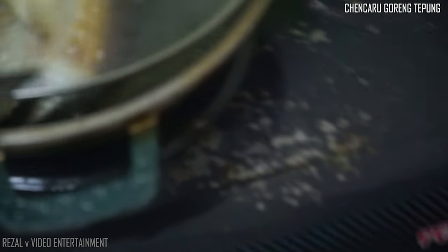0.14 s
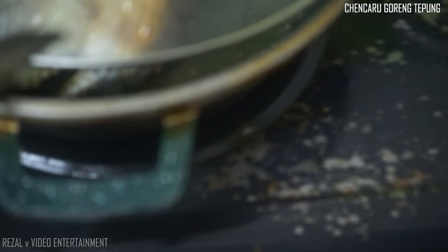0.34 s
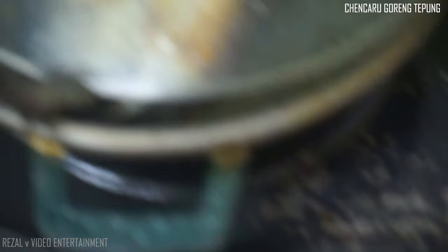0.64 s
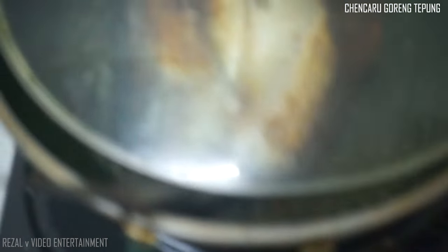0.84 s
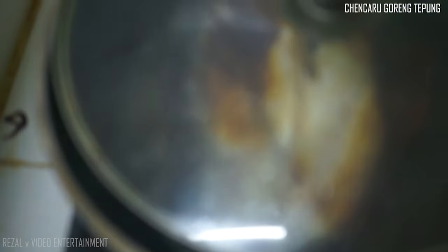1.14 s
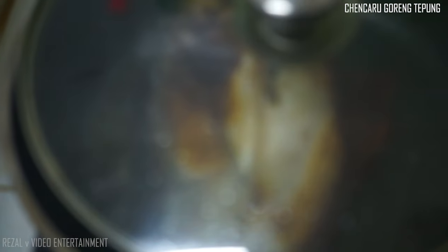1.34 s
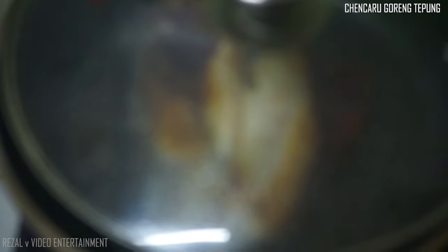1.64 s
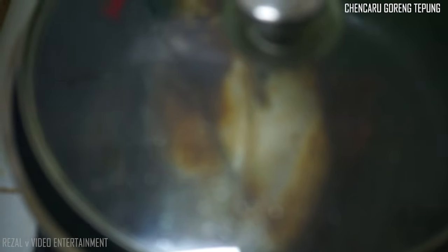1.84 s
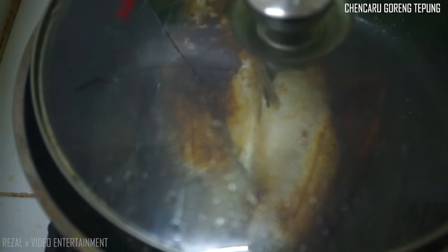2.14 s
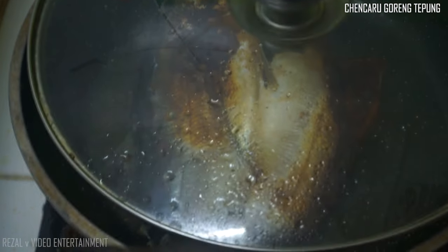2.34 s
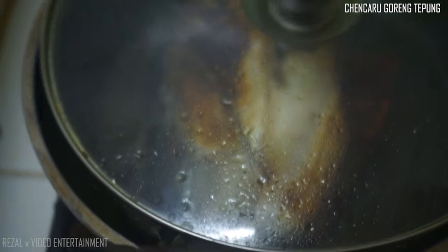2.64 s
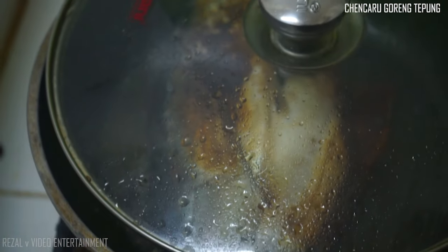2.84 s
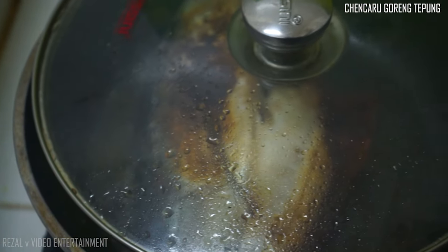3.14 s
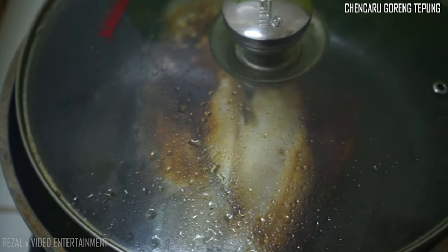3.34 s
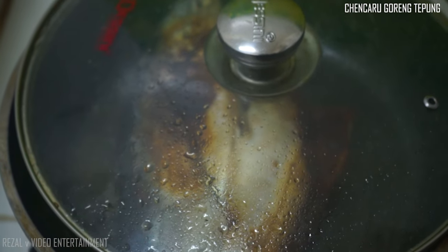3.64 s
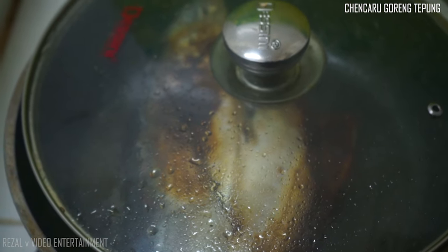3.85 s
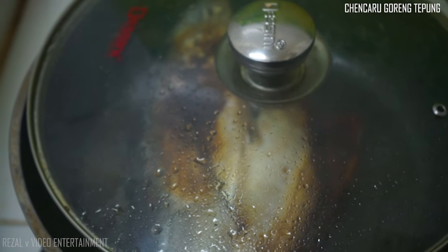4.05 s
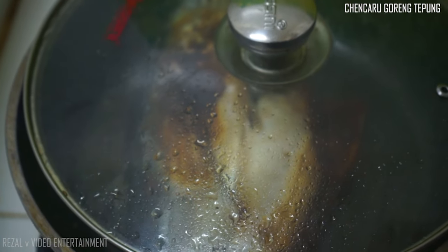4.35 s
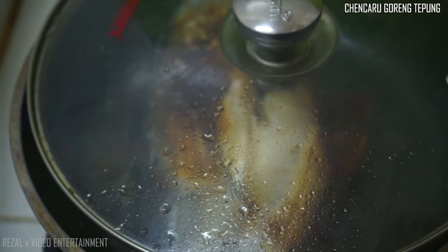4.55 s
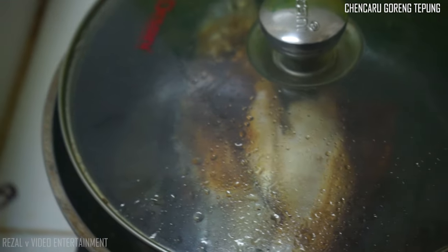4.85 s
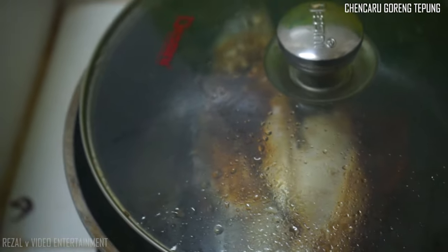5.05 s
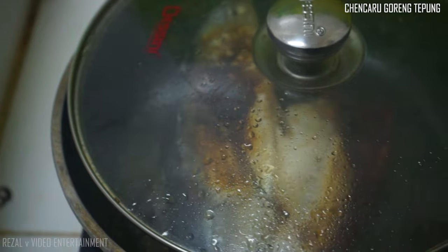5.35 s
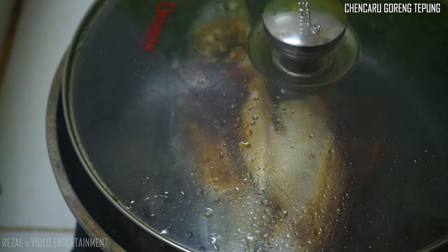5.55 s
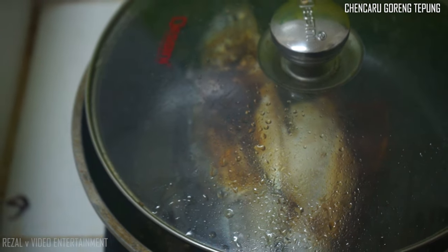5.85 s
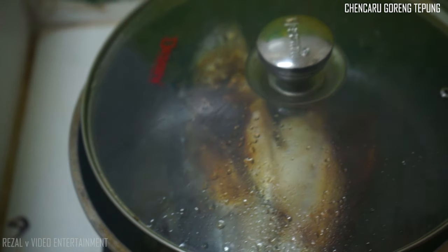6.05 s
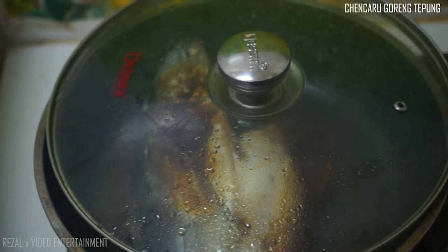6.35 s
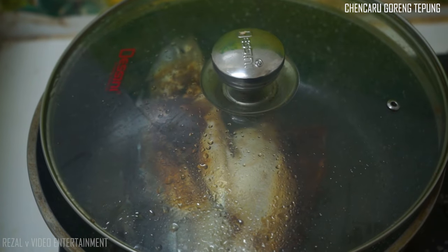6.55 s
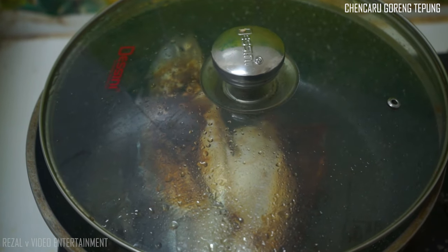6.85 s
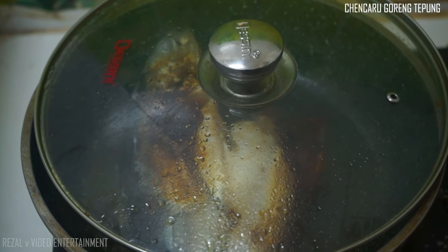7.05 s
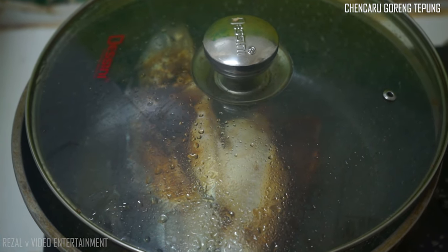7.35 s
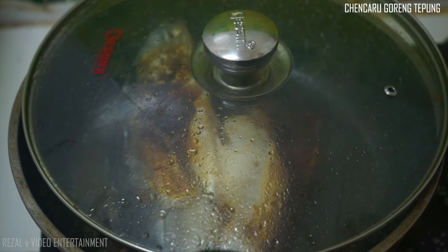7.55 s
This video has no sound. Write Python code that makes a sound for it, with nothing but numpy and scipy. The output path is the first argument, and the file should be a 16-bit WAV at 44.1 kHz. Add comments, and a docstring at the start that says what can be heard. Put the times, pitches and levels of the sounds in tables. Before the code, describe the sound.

Fish frying in hot oil under a glass lid, a dense, steady sizzle with small pops and plops.

```python
"""A dense sizzle: floured fish fries in hot oil under a glass lid, heard from close by in a small kitchen.
Countless steam bubbles burst, each an impulse that excites the resonances of the covered pan:
big ones ring the air under the lid, small ones spatter in spurts, the finest fizz out past the rim.
A few plops, jets of steam and sharp snaps stand out, over a low rumble and a faint mains hum."""
import sys
import numpy as np
from scipy import signal
from scipy.fft import rfft, irfft, next_fast_len
from scipy.io import wavfile
from scipy.ndimage import uniform_filter1d, map_coordinates

SR = 44100
rng = np.random.default_rng(int(sys.argv[2]) if len(sys.argv) > 2 else 0)


def dump(signal):
    """Clip the signal to [-1, 1] and save it as 16-bit WAV at the path in sys.argv[1]."""
    limited = np.clip(np.atleast_2d(signal).T, -1, 1)
    pcm = np.round(limited * 32767).astype(np.int16)
    wavfile.write(sys.argv[1], SR, pcm)


N = 339565
TIME = np.arange(N) / SR
SIZE = next_fast_len(N + SR, real=True)
HZ = np.fft.rfftfreq(SIZE, 1 / SR)
# excitation spectrum of a small bubble: (frequency [Hz], relative level [dB])
SMALL_PUSH = [(200, -15), (1600, -6), (2300, -0.5), (4400, -0.5), (6000, -1.5), (10000, -18), (16000, -18)]


def sizzle():
    """Shot noise: the boil drives four sizes of bubble, stirred together by flurries and surges of steam."""
    # how hard the oil boils: (time [s], relative level [dB])
    boil_curve = [(0, -1), (.7, 0.15), (1.15, -1), (1.65, -1.3), (2, -1.5), (2.7, -0.85), (3.2, -0.4),
                  (3.85, 0), (4.15, 1), (4.78, 1.3), (5.05, 0.5), (5.6, 0.65), (5.98, -0.8), (6.25, 1.5),
                  (6.55, -1), (7.35, -2), (7.7, -1.5)]
    # excitation spectra of big, fine and the finest bubbles: (frequency [Hz], relative level [dB])
    big_push = [(50, -4.5), (400, 3), (1750, 3), (2300, -11), (4000, -32.5), (9000, -14.5)]
    fizz_push = [(200, -21), (2500, -7.5), (4200, -4.5), (5500, 2.5), (9500, 0), (11500, -5.5),
                 (16000, -12.5)]
    spray_push = [(200, -40), (5000, -16), (8500, -11), (11000, -2.5), (16000, 4)]
    boil, = curves(boil_curve)
    steam, surge = flurries(rate=90, life=0.011), wobble(16)
    drying_db = 0.13 * (TIME - TIME.mean())  # the spatter thins as the crust dries
    big_db = -37.5 + 0.84 * boil + 1.08 * steam + 0.5 * wobble(14)
    small_db = -26 + boil - drying_db + 1.55 * steam + 0.65 * surge
    fizz_db = -22.5 + 0.85 * boil + 0.09 * steam + 0.3 * surge + 0.65 * wobble(22)
    spray_db = -27 + 1.05 * boil + 1.1 * flurries(rate=55, life=0.014) + 0.47 * surge
    spray_gain = np.hypot(amp(spray_db), jets())
    big = amp(big_db) * blurred(bursts(rate=550, scatter_db=2.5, spread=0.063), haze_db=-24, life=0.015)
    small = amp(small_db) * blurred(bursts(3000, scatter_db=4.5, spread=0.38), haze_db=-5.5, life=0.0042)
    fizz = amp(fizz_db) * blurred(bursts(6000, scatter_db=4.5, spread=0.29), haze_db=0.5, life=0.0032)
    spray = spray_gain * blurred(bursts(5000, scatter_db=5, spread=0.78), haze_db=2, life=0.0037)
    crackle = through_pan(small, SMALL_PUSH) + through_pan(fizz, fizz_push)
    return through_pan(big, big_push) + shifting(crackle, patchy_db=1.67) + through_pan(spray, spray_push)


def bursts(rate, scatter_db, spread):
    """A Poisson process: rate clicks a second, of random size and place in the pan; stereo, rms 1."""
    at = np.flatnonzero(rng.random(N) < rate / SR)
    size, side = rng.standard_normal((2, N))[:, at]
    polarity = np.where(at % 2, 1, -1)
    strength = amp(scatter_db * np.clip(size, -2, 2)) * polarity
    place = np.pi / 4 + spread * np.tanh(side)
    clicks = np.zeros((2, N))
    clicks[:, at] = strength * np.array([np.cos(place), np.sin(place)])
    return unit(clicks)


def flurries(rate, life):
    """Relaxation: activity jumps at random moments and dies away; mean 0, rms 1."""
    starts = rng.exponential(size=N).clip(0, np.pi) * (rng.random(N) < rate / SR)
    activity = decaying(starts, life)
    return unit(activity - activity.mean())


def blurred(clicks, haze_db, life):
    """Diffuse reflection: the echoes of countless bubbles merge into a trailing hiss, unlike at each ear."""
    energy = decaying(np.mean(clicks ** 2, axis=0), life)
    haze = unit(np.sqrt(energy) * rng.standard_normal((2, N)))
    return unit(clicks + amp(haze_db) * haze)


def through_pan(x, push, low_hz=170, size=4096):
    """Source and filter: impulses with the spectrum push ring the covered pan, at unit power gain."""
    # modes of the pan and the air under its lid: (frequency [Hz], bandwidth [Hz], relative level [dB])
    pan_modes = [(240, 114, -20), (484, 175, -9.5), (628, 265, -15), (1094.5, 163, 0), (1650.5, 148, -1.5),
                 (1958, 185, -6.5), (2213, 340, -4.5), (2547, 216, -0.5), (2865, 363, 1.5),
                 (3560, 370, -0.1), (3996, 180, -2), (4296, 250, -0.5), (4710, 115, -0.5),
                 (5600, 640, -4.5), (6130, 730, -4)]
    # sound leaking straight past the rim: (frequency [Hz], relative level [dB])
    leak = [(40, -66), (200, -32), (800, -21), (1500, -19), (3200, -9.5), (4600, -4.5), (6300, -2.5),
            (7600, -1), (8600, -2.5), (9800, -3), (10800, -6.5), (12500, -9.5), (14200, -14.5),
            (16000, -19)]
    f = np.fft.rfftfreq(size, 1 / SR)
    mode_power = sum((amp(db) / (1 + (2 * (f - hz) / width) ** 2)) ** 2 for hz, width, db in pan_modes)
    pan_gain = np.sqrt(mode_power + amp(along(leak, f)) ** 2)
    radiated = f ** 3 / np.hypot(f ** 3, low_hz ** 3)  # the pan is too small to give off bass
    response = causal(unit(pan_gain * radiated * amp(along(push, f))))
    return signal.oaconvolve(x, response[None], axes=1)[:, :N]


def shifting(x, patchy_db, patch_size=(3, 14)):
    """Modal coupling depends on position: as the bubbling moves about, resonances come and go."""
    spectra = signal.stft(x, nperseg=512)[2]
    patches = rng.standard_normal(spectra.shape[1:])
    for axis, width in enumerate(patch_size):  # bins, then frames
        patches = uniform_filter1d(patches, width, axis)
    return signal.istft(spectra * amp(patchy_db * unit(patches)), nperseg=512)[1][:, :N]


def spurts(gain_db=-3, ring_db=2, width_hz=550, crack_db=15.5):
    """Flash boiling of juice: a crack, then a fading swarm of bubbles ringing at the pitch of its spot."""
    # juice meeting the oil: (time [s], relative level [dB], decay time [s], ring frequency [Hz])
    drops = [(.133, -16, 0.013, 2820), (.288, -20, 0.0077, 5530), (.352, -19, .012, 4220),
             (.371, -18.5, 0.015, 4740), (.442, -16, .008, 3500), (.64, -23, .04, 5900),
             (.915, -15, 0.0093, 6060), (1.485, -18, .014, 4300), (1.554, -23, .006, 5500),
             (2.416, -21.5, 0.016, 4370), (2.622, -19, 0.033, 3730), (2.83, -16.5, 0.012, 4250),
             (2.856, -21.5, 0.018, 3590), (2.893, -16, .015, 2820), (2.957, -16, 0.0041, 3560),
             (3.07, -21, .015, 5900), (3.235, -17.5, .011, 5420), (3.281, -17.5, .008, 5490),
             (3.521, -16.5, 0.0088, 2580), (3.8, -18.5, 0.0083, 5510), (3.988, -21, 0.011, 2920),
             (4.209, -15, .008, 6140), (4.509, -16.5, 0.0088, 4330), (4.687, -20.5, 0.042, 3600),
             (5.367, -18, .02, 6150), (5.54, -17, .015, 4650), (5.671, -20, .01, 6080),
             (6.13, -18, 0.015, 5470), (6.562, -20, 0.022, 2890), (6.635, -25, 0.011, 4080),
             (6.751, -20, 0.022, 4330), (7.513, -16.5, 0.013, 5680)]
    swarm = blurred(bursts(rate=7000, scatter_db=3.5, spread=0.35), haze_db=-9, life=0.006)
    puffs, cracks = np.zeros((2, N)), np.zeros((1, N))
    for s, db, life, hz in drops:
        start = round(s * SR)
        t = TIME[:N - start][:SR // 4]
        span = slice(start, start + len(t))
        puff = amp(db + gain_db) * np.exp(-t / life) * swarm[:, span]
        ring = signal.lfilter(*signal.iirpeak(hz, hz / width_hz, SR), puff)
        puffs[:, span] += puff + amp(ring_db) * ring
        cracks[0, start] = amp(db + crack_db)
    # excitation spectrum of a crack: (frequency [Hz], relative level [dB])
    crack_push = [(200, -7), (1200, -1), (4000, -0.5), (7000, -7), (16000, -20)]
    return through_pan(puffs, SMALL_PUSH) + through_pan(cracks, crack_push)


def plops(gain_db=10.5, boom_db=-26, boom_life=0.042, churn_db=-31, churn_life=0.008):
    """Impulse excitation: a big bubble pushes the air under the lid, churns the oil and booms the pan."""
    # big bubbles bursting: (time [s], relative level [dB], boom offset [dB])
    bubbles = [(.442, -16, -12), (.982, -15.5, -8), (1.178, -16, -12), (1.555, -15.5, -17),
               (2.627, -16.5, -9), (3.201, -11.5, .5), (3.519, -15, -4), (4.223, -11.5, -10),
               (4.305, -8, -4.5), (4.42, -18, -10), (4.638, -15, -2), (4.687, -17, -4), (4.908, -15, -13),
               (5.224, -11.5, -12), (5.249, -3.2, -10), (5.284, -16, -12), (5.507, -17.5, -9),
               (6.776, -18.5, -3), (6.905, -17, -8), (7.31, -17, 0)]
    # spectra of their push and of the pan's low after-ring: (frequency [Hz], relative level [dB])
    heavy_push = [(100, -18), (250, -11), (490, 0), (1100, 1.3), (1750, 1), (2200, -17), (4500, -22),
                  (9000, -58)]
    boom_spectrum = [(80, -40), (150, -28), (210, -6.5), (320, -15), (450, 7), (620, 4.5), (900, -33),
                     (2500, -60)]
    blows, shakes = np.zeros((2, 1, N))
    for s, db, offset_db in bubbles:
        blows[0, round(s * SR)] = amp(db + gain_db)
        shakes[0, round(s * SR)] = amp(db + offset_db + boom_db)
    churn = amp(churn_db) * decaying(blows, churn_life) * rng.standard_normal(N)
    shudder = decaying(shakes, boom_life) * rng.standard_normal(N)
    boom = filtered(shudder, unit(amp(along(boom_spectrum))))
    return through_pan(blows + churn, heavy_push) + boom


def snaps(gain_db=-7.5, life=0.0006):
    """A brief pulse has a broad spectrum: a droplet shatters within a millisecond."""
    # droplets bursting at the rim: (time [s], relative level [dB])
    droplets = [(1.025, -4), (2.141, -6), (2.275, -5), (2.634, -5), (2.921, -5), (3.099, -5), (3.792, -6),
                (4.181, -5), (4.747, -5), (4.909, -4), (5.368, -4), (5.406, -6), (5.838, -6), (6.131, -6)]
    # their excitation spectrum: (frequency [Hz], relative level [dB])
    sharp_push = [(200, -20), (2000, -15), (5000, 3), (9000, 21), (16000, -8)]
    blows = np.zeros(N)
    for s, db in droplets:
        blows[round(s * SR)] = amp(db + gain_db)
    shards = unit(rng.choice([-1, 1], (2, N)) + rng.choice([-1, 1], N))  # partly alike at both ears
    return through_pan(decaying(blows, life) * shards, sharp_push)


def jets():
    """Incoherent sources add in power: the joint envelope of steam jets, each a bell-shaped swell."""
    # steam hissing out at the rim: (peak time [s], level [dB], length [s])
    swells = [(.16, -28, .09), (.545, -27, .035), (1.675, -25, .035), (2.214, -25, .03), (4.74, -28, .15),
              (6.31, -25, 0.15), (7.634, -28, .04)]
    return np.sqrt(sum(amp(db) ** 2 * np.exp(-(2 * (TIME - s) / length) ** 2) for s, db, length in swells))


def drifting(x, rings_hz=(1095, 1660, 2480), width_hz=200):
    """Standing waves under the lid swell and fade as the microphone drifts over the pan."""
    # pickup of the three rings: (time [s], low gain [dB], middle gain [dB], high gain [dB])
    pickup = [(0, 2, -1.5, -1.5), (1.3, -1.5, 0.5, -3), (2.2, 1, 3, 0.5), (3.2, -0.5, 2, 0),
              (4.3, 1.5, 5.5, 3), (5.3, 0, 1, -1.5), (6.2, -0.5, 0, -2), (7, -.3, 0.5, 0),
              (7.7, -2.2, -3, -2.5)]
    rings = [filtered(x, np.exp(-((HZ - hz) / width_hz) ** 2)) for hz in rings_hz]
    return x + sum((amp(db) - 1) * ring for db, ring in zip(curves(pickup), rings))


def rising(x, midway_s=0.95, time_scale_s=1):
    """Directivity: the colour changes as the microphone rises from beside the pan to above the lid."""
    # colour beside the pan: (frequency [Hz], gain [dB])
    side_colour = [(300, -1.5), (450, 3), (750, -3.5), (1100, 0.5), (1950, 2), (2450, 0), (3000, -.5),
                   (3600, 2), (5000, 0.5), (7000, -1.5), (14000, 1)]
    beside = 0.5 - 0.5 * np.tanh((TIME - midway_s) / time_scale_s)
    return x + beside * filtered(x, amp(along(side_colour)) - 1)


def kitchen(x, places=6, early_t60=0.1):
    """Reverberation from stove and tiled walls; the echoes change as the microphone drifts."""
    # decay of the room: (frequency [Hz], reverberation time [s])
    t60 = [(200, 0.96), (2000, 0.32), (6000, 0.13), (15000, 0.052)]
    # reverberant over direct sound: (frequency [Hz], ratio [dB])
    room_ratio = [(100, -12), (500, -9.5), (1200, -8.5), (2500, -6), (5000, -10.5), (14000, -8)]
    wet = amp(along(room_ratio))
    source = filtered(unit(x.mean(axis=0)) * x.std(), wet / np.hypot(1, wet))
    out = filtered(x, 1 / np.hypot(1, wet))
    for place in range(places):
        hz, t, noise = signal.stft(rng.standard_normal((2, SR // 4)), SR, nperseg=256)
        decay = amp(-60 * t / along(t60, hz)[:, None]) + 2 * amp(-60 * t / early_t60)
        decay /= np.linalg.norm(decay, axis=1, keepdims=True)
        tail = signal.istft(noise * decay, SR, nperseg=256)[1]
        tail /= np.linalg.norm(tail, axis=1, keepdims=True)
        crossfade = np.sqrt(np.maximum(0, 1 - np.abs(np.linspace(0, places - 1, N) - place)))
        out += crossfade * signal.oaconvolve(source[None], tail, axes=1)[:, :N]
    return out


def background():
    """The noise floor: a low room rumble and the tonal hum of appliances, wavering in phase."""
    # spectrum of the rumble: (frequency [Hz], relative level [dB])
    rumble_spectrum = [(20, -20), (50, -9), (85, -5), (170, 2), (300, 9), (700, -27), (3000, -60)]
    # mains hum: (frequency [Hz], rms level [dB])
    tones = [(100, -74), (120, -78)]
    noise = rng.standard_normal(N) + 0.06 * rng.standard_normal((2, N))
    hum = sum(amp(db) * np.sqrt(2) * np.sin(2 * np.pi * hz * TIME + 0.4 * wobble(5.4)) for hz, db in tones)
    rumble = unit(filtered(noise, amp(along(rumble_spectrum))))
    return amp(-62 + 1.2 * wobble(7)) * rumble + hum


def amp(db):
    """Decibels to amplitude ratio."""
    return 10 ** (np.asarray(db) / 20)


def unit(x):
    """Normalise to rms 1."""
    return x / np.sqrt(np.mean(x ** 2) + 1e-20)


def along(points, hz=HZ):
    """Interpolate (frequency [Hz], value) points on a log axis."""
    f, values = np.transpose(points)
    return np.interp(np.log(hz + 1), np.log(f + 1), values)


def curves(rows):
    """Interpolate each column after the time to one value per sample."""
    s, *columns = np.transpose(rows)
    return [np.interp(TIME, s, column) for column in columns]


def wobble(rate):
    """Smooth random modulation, rate knots a second."""
    return map_coordinates(rng.standard_normal(int(N * rate / SR) + 4), [TIME * rate])


def decaying(x, life):
    """Exponential decay: each impulse falls to 1/e in life seconds."""
    return signal.lfilter([1], [1, -np.exp(-1 / (life * SR))], x)


def filtered(x, response):
    """Linear filtering: the spectrum of x times a response on the grid HZ."""
    return irfft(rfft(x, SIZE) * response, SIZE)[..., :N]


def causal(gain):
    """Minimum phase: an impulse response with this gain that rings only after the blow."""
    cepstrum = irfft(np.log(np.maximum(gain, 1e-6)))
    half = len(cepstrum) // 2
    cepstrum[1:half] *= 2
    cepstrum[half + 1:] = 0
    return irfft(np.exp(rfft(cepstrum)))


def scene():
    """Superposition of pan and room; an interaural level difference sets the pan a little to the right."""
    # stereo balance: (frequency [Hz], left minus right [dB])
    balance = [(100, -4), (500, -1.1), (2700, -2), (4200, 0.5), (6000, -1), (9000, -2.5), (11500, -3),
               (14500, 0)]
    pops = plops() + snaps()
    oil = sizzle() + spurts() + pops
    heard = kitchen(rising(drifting(oil)))
    ear_gains = amp(np.outer([0.5, -0.5], along(balance)))
    return filtered(heard, ear_gains) + background()


def record(dry, top_hz=15750):
    """Band limiting: nothing above top_hz is kept."""
    return filtered(dry, HZ < top_hz)


dry = scene()
out = record(dry)
dump(out)
```